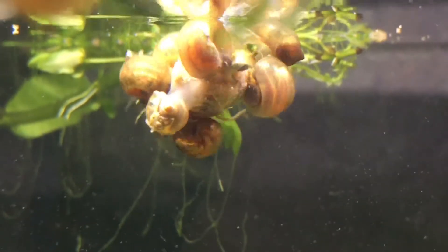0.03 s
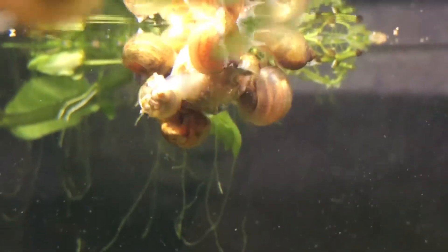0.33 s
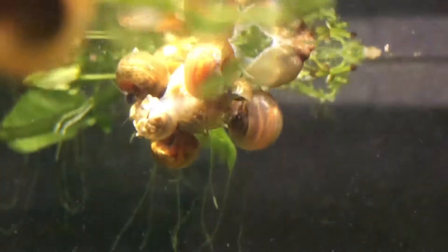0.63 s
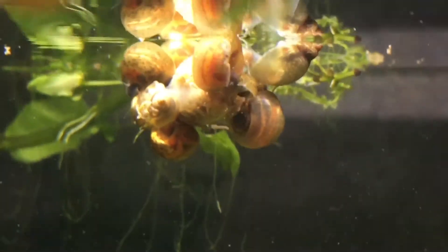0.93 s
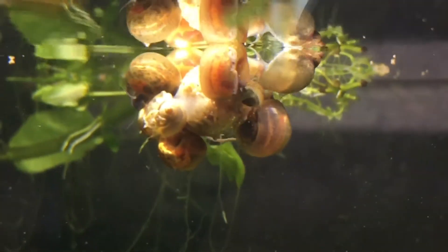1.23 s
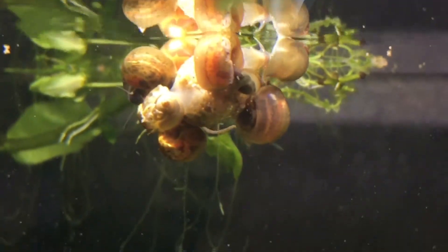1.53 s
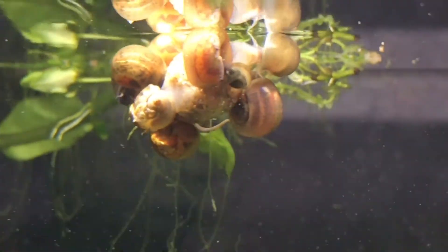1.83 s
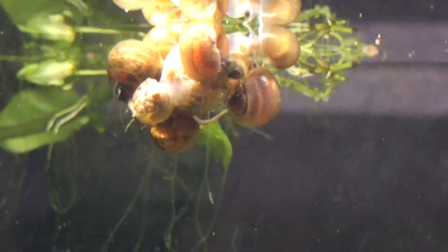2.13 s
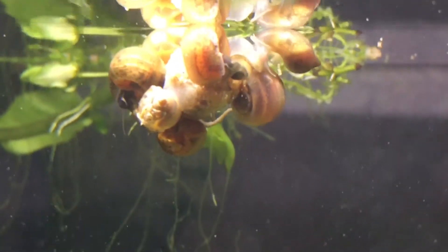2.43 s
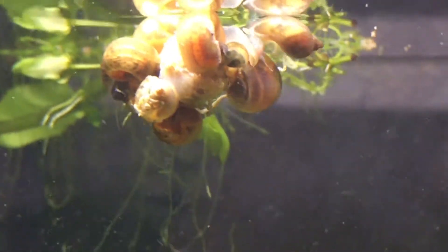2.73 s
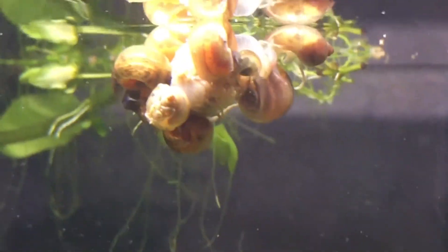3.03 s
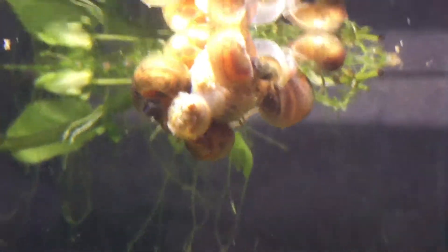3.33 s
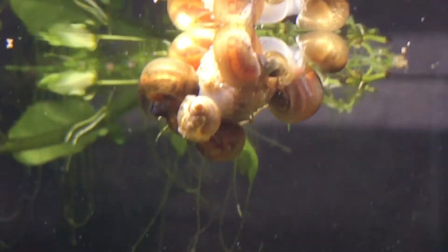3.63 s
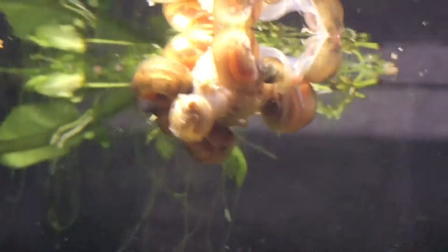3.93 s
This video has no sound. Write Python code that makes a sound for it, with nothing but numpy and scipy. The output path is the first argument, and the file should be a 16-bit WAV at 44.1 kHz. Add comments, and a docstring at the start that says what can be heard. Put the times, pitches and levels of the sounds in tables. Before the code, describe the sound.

Low aquarium hum and soft rush, with light bubbling, gurgles and tiny drips.

```python
"""A small room with an aquarium: a steady mains-driven pump beats against a motor that slowly loses speed.
Water trickles, gurgles and blips as bubbles ring at their resonances, and the air under the hood
rings on in sympathy. Tiny bubbles burst at the surface, and glass and walls reflect the higher
water sounds, all over a low rush of moving air and water and a thin hiss."""
import sys
import numpy as np
from scipy import signal
from scipy.fft import rfft
from scipy.io import wavfile
from scipy.ndimage import uniform_filter1d

SR = 44100
rng = np.random.default_rng(int(sys.argv[2]) if len(sys.argv) > 2 else 0)


def pcm_store(signal):
    """Save signal as 16-bit PCM."""
    levels = np.round(np.clip(np.atleast_2d(signal), -1, 1) * 32767)
    wavfile.write(sys.argv[1], SR, levels.astype(np.int16).T)


N = 176400

BLIP_RISE_S, BLIP_DECAY_S, BLIP_GLIDE_PER_S = 0.0021, 0.0035, 1.1
GULP_RISE_S, GULP_DECAY_S = 0.0083, 0.03


def amp(db):
    """The decibel scale: 20 dB is a factor of ten in amplitude."""
    return 10 ** (np.asarray(db) / 20)


def unit_rms(x):
    """Normalisation to a mean power of one."""
    return x / np.sqrt(np.mean(x ** 2) + 1e-20)


def add(mix, start_s, sound):
    """Superposition: a sound sums into the mix from its start time on."""
    part = mix[max(0, round(start_s * SR)):][:len(sound)]
    part += sound[:len(part)]


def noise(spectrum, peaks, patchy_db):
    """Spectral shaping: a curve with Gaussian peaks colours noise whose level drifts in small patches."""
    hz = np.fft.rfftfreq(N, 1 / SR)
    knots_hz, knots_db = np.transpose(spectrum)
    colour_db = np.interp(np.log(hz + 1), np.log(knots_hz), knots_db)
    colour_db += sum(db * np.exp(-2 * ((hz - centre) / width) ** 2) for centre, width, db in peaks)
    cells = signal.stft(rng.standard_normal(N), nperseg=512)[2]
    patches = uniform_filter1d(rng.standard_normal(cells.shape), size=7, axis=0)  # across frequency
    patches = unit_rms(uniform_filter1d(patches, size=14, axis=1))  # across time
    white = signal.istft(cells * amp(patchy_db * patches), nperseg=512)[1][:N]
    return unit_rms(np.fft.irfft(rfft(white) * amp(colour_db), N))


def bubble(hz, rise_s, decay_s, glide_per_s=0):
    """A bubble is a damped oscillator: its ring swells and dies, climbing in pitch if given a glide."""
    t = np.arange(SR // 5) / SR
    envelope = (1 - np.exp(-(t / rise_s) ** 2)) * np.exp(-t / decay_s)
    return envelope / envelope.max() * np.sin(2 * np.pi * hz * (t + glide_per_s * t ** 2 / 2))


def bubbles(rows, rise_s, decay_s, glide_per_s=0):
    """Independent bubbles add linearly, one to a row of (time [s], level [dB], pitch [Hz])."""
    out = np.zeros(N)
    for start_s, db, hz in rows:
        add(out, start_s, amp(db) * bubble(hz, rise_s, decay_s, glide_per_s))
    return out


def hum():
    """Beats: the pump holds the mains pitch while the motor sags below it, so they beat ever faster."""
    # pump harmonics (multiple of the mains frequency, level [dB])
    pump_harmonics = [(1, -48.5), (2, -55), (3, -74), (4, -77), (5, -71), (6, -77), (8, -83.5), (10, -82.5)]
    # motor harmonics (multiple of the motor's speed, relative level [dB])
    motor_harmonics = [(1, 2), (2, -3), (3, -15), (5, -13.5)]
    # slowing of the motor (time [s], speed [Hz])
    motor_speed = [(0, 58.85), (.6, 58.8), (1, 57.95), (2, 56.77), (4, 54.55)]
    # swell and fade of the motor (time [s], level [dB])
    motor_level = [(0, -73), (.3, -56), (.9, -52.5), (1.5, -54.5), (2.1, -59.5), (2.9, -61), (4, -66.5)]
    mains_hz, in_step_s = 59.99, 0.21
    t = np.arange(N) / SR
    pump_turns = mains_hz * (t - in_step_s)
    motor_turns = np.cumsum(np.interp(t, *np.transpose(motor_speed))) / SR
    motor_turns -= np.interp(in_step_s, t, motor_turns)
    pump = sum(amp(db) * np.sin(2 * np.pi * k * pump_turns) for k, db in pump_harmonics)
    motor = sum(amp(db) * np.cos(2 * np.pi * k * motor_turns) for k, db in motor_harmonics)
    motor_gain = amp(np.interp(t, *np.transpose(motor_level)))
    return np.sqrt(2) * (pump + motor_gain * motor)


def rush():
    """Source and filter: resonances of tank and cabinet colour the noise of moving air and water."""
    # spectrum of the flow (frequency [Hz], relative spectral level [dB])
    spectrum = [(20, -27), (45, -1), (85, 2), (135, -3), (190, -5), (330, -9.5), (450, -14), (800, -21.5),
                (1250, -21.5), (2000, -28), (3000, -32), (5000, -49.5)]
    # resonances of tank and cabinet (frequency [Hz], width [Hz], lift [dB])
    resonances = [(157, 14, 6.5), (188, 16, 3), (255, 26, 3), (295, 18, 5.5), (365, 18, 6), (394, 22, 11),
                  (565, 26, 7), (679, 30, 9), (779, 36, 6.5), (993, 42, 5.5), (1145, 60, 4.5),
                  (3000, 110, 4)]
    return amp(-55) * noise(spectrum, resonances, patchy_db=1)


def hiss():
    """Broadband noise, thin and high, whose narrow spectral peaks are heard as a faint whine."""
    # spectrum of the hiss (frequency [Hz], relative spectral level [dB])
    spectrum = [(500, -19), (3000, -4.5), (4100, -0.5), (4950, -5.5), (5500, -3), (6400, -2.5),
                (7500, -6.5), (9100, -3), (10400, -6.5), (11200, -2.5), (12100, -1.5), (12800, -2.5),
                (15700, 0.5)]
    # peaks of the whine (frequency [Hz], width [Hz], lift [dB])
    whine = [(9050, 80, 4), (12060, 90, 6)]
    return amp(-72) * noise(spectrum, whine, patchy_db=1.4)


def trickle():
    """Bubble resonance: many faint bubbles ring at random moments, the higher ones weaker."""
    per_s, low_hz, high_hz = 55, 583, 2593
    base_db, spread_db, tilt_db_per_octave = -70, 2.2, -3.5
    when, pitch, chance = rng.random((int(per_s * N / SR), 3)).T
    hz = low_hz * (high_hz / low_hz) ** pitch
    db = base_db + spread_db * np.minimum(-np.log(chance), 3) + tilt_db_per_octave * np.log2(hz / low_hz)
    return bubbles(zip(when * N / SR, db, hz), BLIP_RISE_S, BLIP_DECAY_S, BLIP_GLIDE_PER_S)


def gurgle():
    """Larger bubbles resonate lower and longer; they murmur at random in the moving water."""
    per_s, low_hz, high_hz = 22, 236, 892.7
    top_db, spread_db, tilt_db_per_octave = -56.5, 13, -3.5
    when, pitch, chance = rng.random((int(per_s * N / SR), 3)).T
    hz = low_hz * (high_hz / low_hz) ** pitch
    db = top_db - spread_db * chance + tilt_db_per_octave * np.log2(hz / low_hz)
    return bubbles(zip(when * N / SR, db, hz), GULP_RISE_S, GULP_DECAY_S)


def fizz():
    """Tiny bubbles burst at random moments, each a high, quickly damped oscillation."""
    per_s, low_hz, high_hz = 48, 2970, 13630
    base_db, spread_db, decay_s = -79, 2, 0.00099
    when, pitch, chance = rng.random((int(per_s * N / SR), 3)).T
    hz = low_hz + (high_hz - low_hz) * pitch
    db = base_db + spread_db * np.minimum(-np.log(chance), 3)
    return bubbles(zip(when * N / SR, db, hz), decay_s / 2, decay_s)


def blips():
    """Each blip is a bubble's short free oscillation with a noise burst of splash and spray."""
    # water blips (time [s], level [dB], pitch [Hz], splash weight [ratio])
    events = [(0.144, -64, 1680, 1.7), (.335, -64, 1560, 2.5), (.425, -65, 1770, 1.4),
              (.535, -60, 1010, .5), (.557, -60, 1300, 2.1), (.583, -64, 1710, .96),
              (.615, -63, 1160, 0.35), (.628, -55, 1020, 0.25), (.925, -62, 1410, 2),
              (.936, -56, 670, 0.61), (.941, -57, 1550, 0.82), (1.011, -51.5, 1710, 0.99),
              (1.018, -50.5, 1840, 0.24), (1.207, -57.5, 1680, 0.97), (1.364, -55, 1130, 0.22),
              (1.366, -53, 736, 0.32), (1.395, -64.5, 2320, 0.25), (1.413, -55, 976, 0.29),
              (1.428, -58.5, 1393, 0.79), (1.653, -49.5, 1547, 0.28), (1.659, -53.5, 1760, .3),
              (1.833, -51, 754, .2), (2.094, -57, 750, 1.54), (2.115, -67, 1650, 1.6),
              (2.155, -66, 1770, 1), (2.352, -61.5, 1654, 1.6), (2.466, -53, 695, 0.67),
              (2.488, -61, 800, 0.76), (2.632, -62, 1700, 0.92), (2.640, -58, 770, .4),
              (2.682, -59, 1630, .9), (3.165, -58.5, 790, .3), (3.265, -57.5, 1554, 1.5),
              (3.355, -56, 1510, 1.3), (3.603, -53.5, 760, 0.43), (3.606, -52.5, 1680, 0.52),
              (3.690, -43, 1514, 0.9), (3.694, -50.5, 984, 0.58), (3.704, -50.5, 1147, 0.53),
              (3.731, -40, 1528, 0.38), (3.755, -52.5, 624, 0.55), (3.838, -61.5, 1490, 1.8),
              (3.958, -62, 2630, .6)]
    splash_band_hz, splash_db, spray_db = [640, 1870], -6, -22
    rise_s, decay_s = 0.0032, 0.014
    out, t = np.zeros(N), np.arange(SR // 5) / SR
    band = signal.butter(4, splash_band_hz, "band", fs=SR, output="sos")
    envelope = (1 - np.exp(-t / rise_s)) * np.exp(-t / decay_s)
    for start_s, db, hz, wetness in events:
        white = rng.standard_normal(len(t))
        splash = amp(splash_db) * unit_rms(signal.sosfilt(band, white)) + amp(spray_db) * white
        ring = bubble(hz, BLIP_RISE_S, BLIP_DECAY_S, BLIP_GLIDE_PER_S)
        add(out, start_s, amp(db) * (ring + wetness * envelope * splash))
    return out


def hood(water):
    """Cavity resonance: the air between water and hood rings on after each blip."""
    # modes of the enclosed air (frequency [Hz], relative level [dB], time to fall 60 dB [s])
    modes = [(1034, -9, .3), (1238, -8, .35), (1428, 0, .35), (1520, 1, .38), (1582, -3, .3),
             (1669, -1, .13), (1744, -5, .09), (1855, 0, .11)]
    t = np.arange(SR // 2) / SR
    ring = sum(amp(db - 60 * t / t60) * np.cos(2 * np.pi * hz * t) for hz, db, t60 in modes)
    return amp(-61) * signal.fftconvolve(water, ring)[:N]


def room(sound):
    """Reverberation: a quick scatter, a few distinct reflections from glass and walls, a short tail."""
    # distinct reflections (delay [s], level [dB])
    reflections = [(.0118, -7.5), (.0228, -9.5), (.0345, -13)]
    scatter_t60_s, scatter_db, tail_t60_s, tail_db = 0.047, -1, 0.31, -7.5
    echoes_per_s, first_echo_s = 3000, 0.0045
    t = np.arange(SR // 2) / SR
    echoes = rng.standard_normal((2, len(t)))
    echoes *= (rng.random(echoes.shape) < echoes_per_s / SR) & (t > first_echo_s)
    scatter = echoes[0] * amp(-60 * t / scatter_t60_s)
    tail = echoes[1] * amp(-60 * t / tail_t60_s)
    response = amp(scatter_db) * scatter / np.linalg.norm(scatter)
    response += amp(tail_db) * tail / np.linalg.norm(tail)
    for delay_s, db in reflections:
        response[round(delay_s * SR)] += amp(db)
    return signal.fftconvolve(sound, response)[:N]


def bursts():
    """Damping shapes the bubbles that burst at the surface: the shortest tick, the longer ones ring."""
    # bursting bubbles (time [s], level [dB], pitch [Hz], decay time [s])
    events = [(.338, -62, 8090, 0.00043), (.680, -69.5, 6200, .0008), (0.749, -63.5, 4460, 0.00097),
              (.915, -70, 12100, .001), (1.024, -58, 13700, .0003), (1.237, -68, 11500, .0006),
              (2.461, -65, 8900, .0005), (2.678, -64, 5740, 0.00045), (2.682, -66, 4160, 0.00066),
              (2.875, -69, 4230, .0015), (3.263, -63, 8950, 0.00039), (3.266, -53, 12100, 0.00015),
              (3.732, -72, 8240, .0008), (3.79, -74, 3460, 0.0019)]
    out = np.zeros(N)
    for start_s, db, hz, decay_s in events:
        add(out, start_s, amp(db) * bubble(hz, decay_s / 2, decay_s))
    return out


def gulps():
    """The low resonance of a single large bubble is heard as a gulp."""
    # gulps of water (time [s], level [dB], pitch [Hz])
    events = [(1.040, -52, 344), (2.055, -47, 261), (2.52, -53, 384), (3.605, -51, 293),
              (3.908, -62.5, 552)]
    return bubbles(events, GULP_RISE_S, GULP_DECAY_S)


def scene():
    """All sources superpose; blips and trickle excite hood and room, the pops the room alone."""
    water = blips() + trickle()
    pops = bursts() + fizz()
    low_water = gulps() + gurgle()
    direct = hum() + rush() + hiss() + water + pops + low_water
    return (direct + hood(water) + room(water + amp(6) * pops))[None]


def record(dry):
    """Band limiting: a steep low-pass filter removes the highest treble."""
    cutoff_hz = 15750
    low_pass = signal.firwin(1023, cutoff_hz, window=("kaiser", 8), fs=SR)
    return signal.oaconvolve(dry, low_pass[None], "same")


dry = scene()
out = record(dry)
pcm_store(out)
```